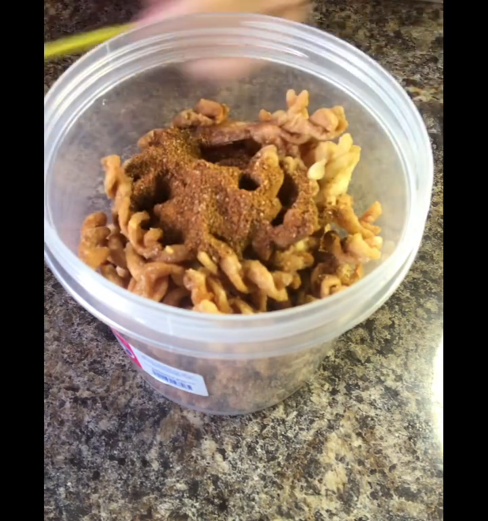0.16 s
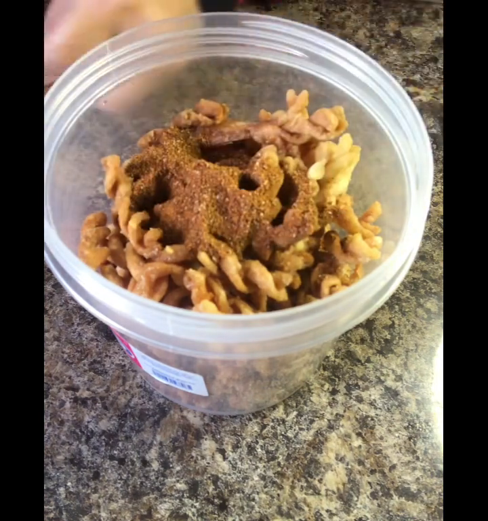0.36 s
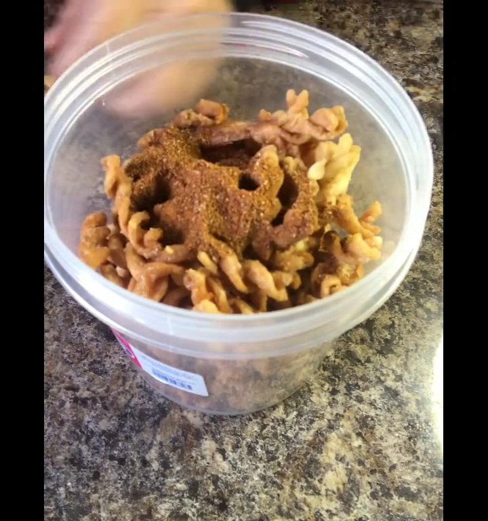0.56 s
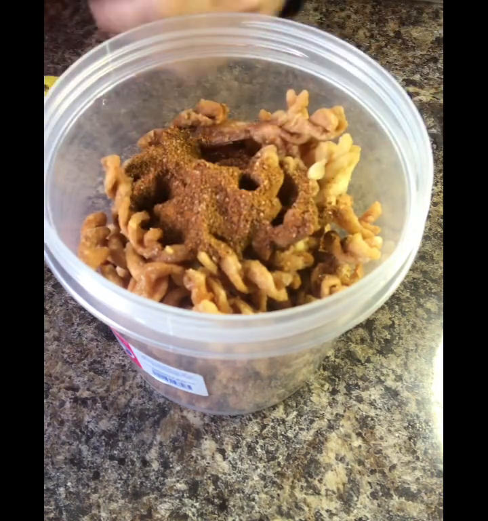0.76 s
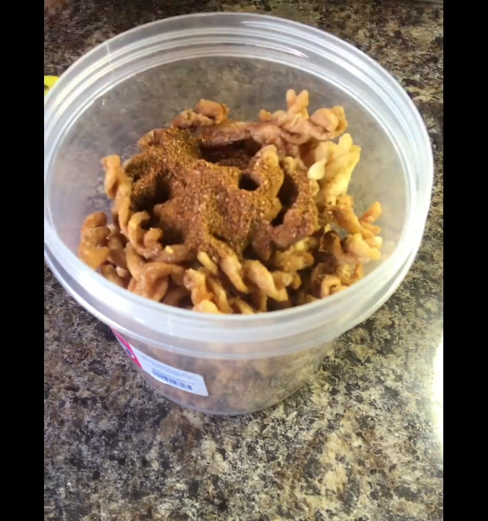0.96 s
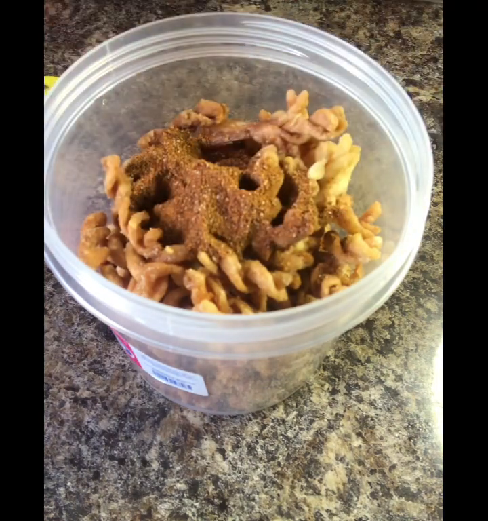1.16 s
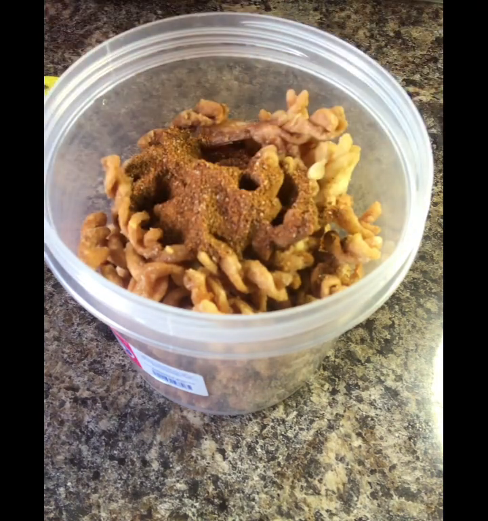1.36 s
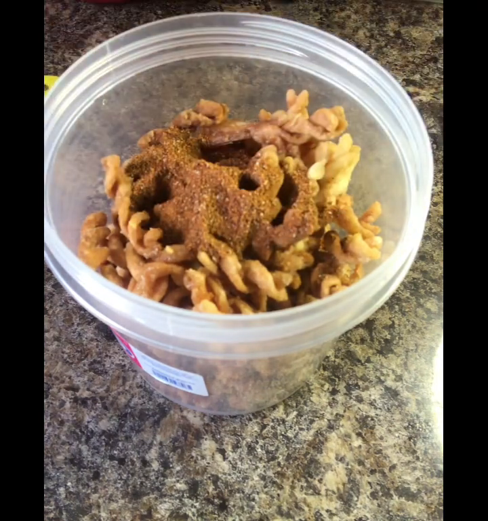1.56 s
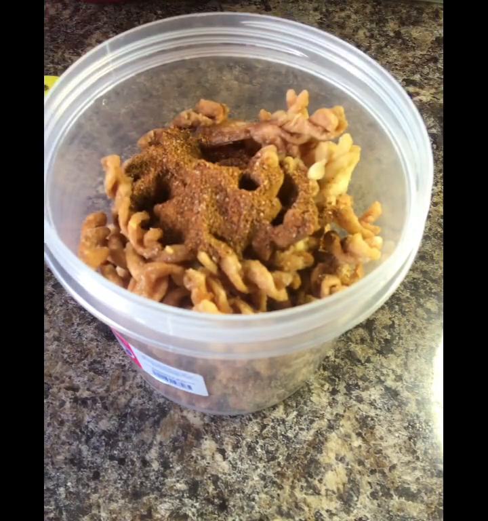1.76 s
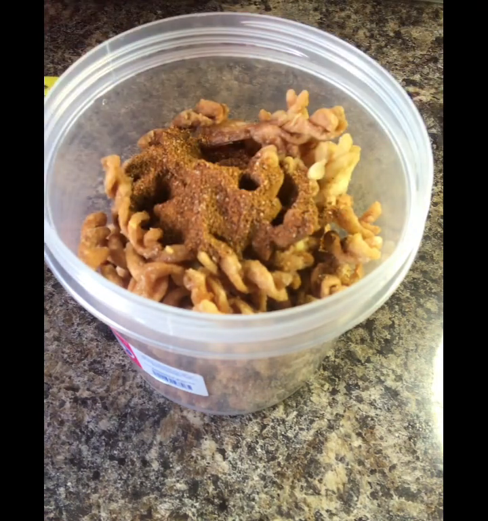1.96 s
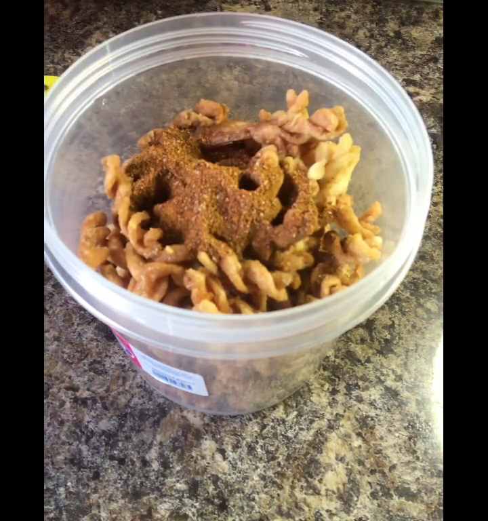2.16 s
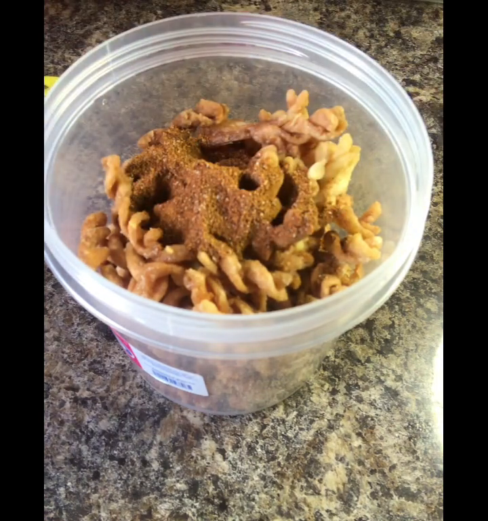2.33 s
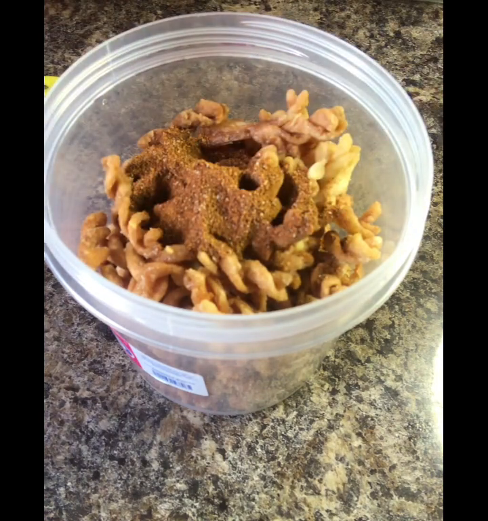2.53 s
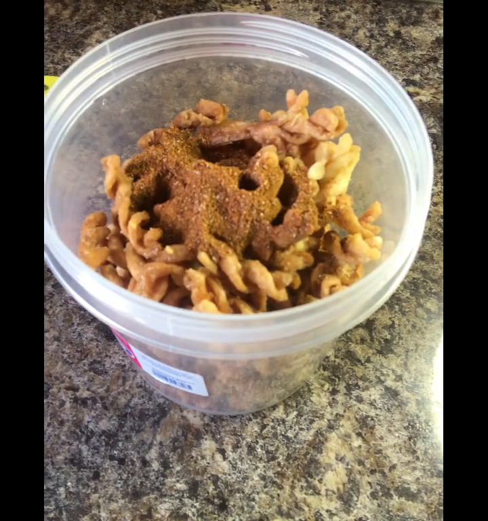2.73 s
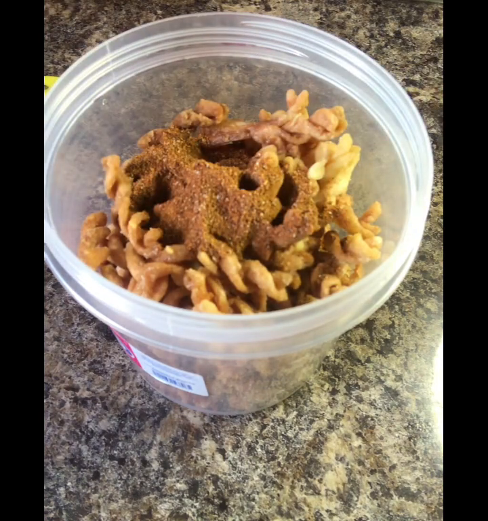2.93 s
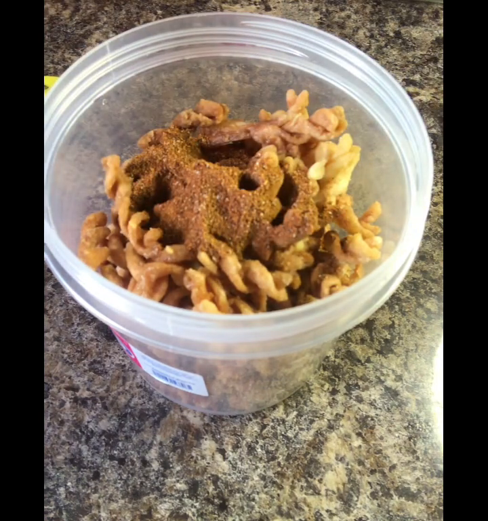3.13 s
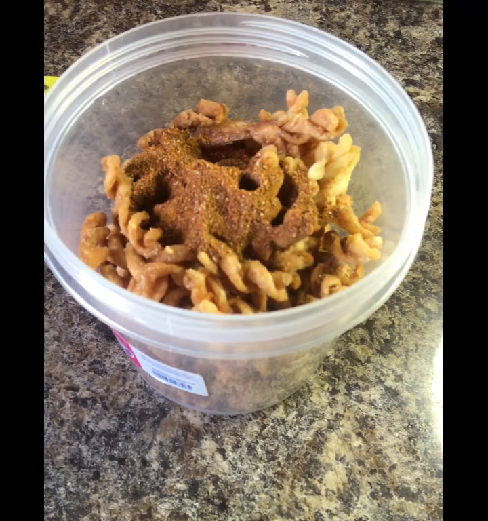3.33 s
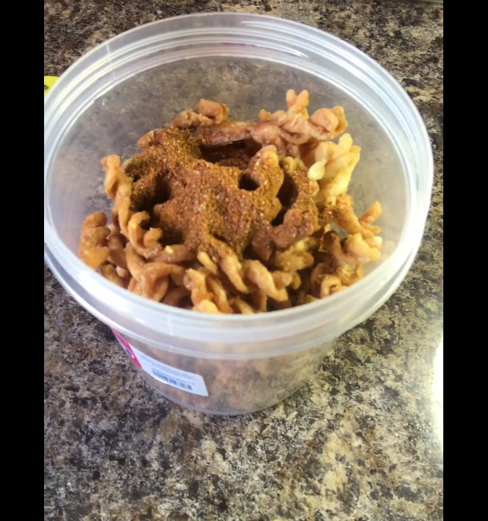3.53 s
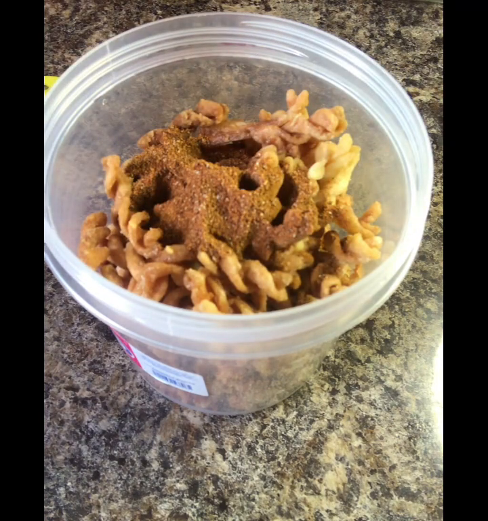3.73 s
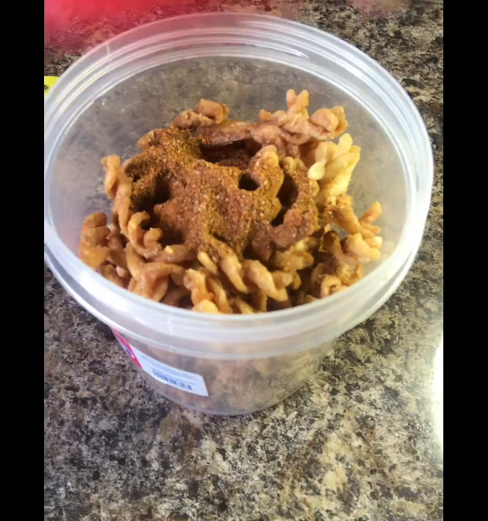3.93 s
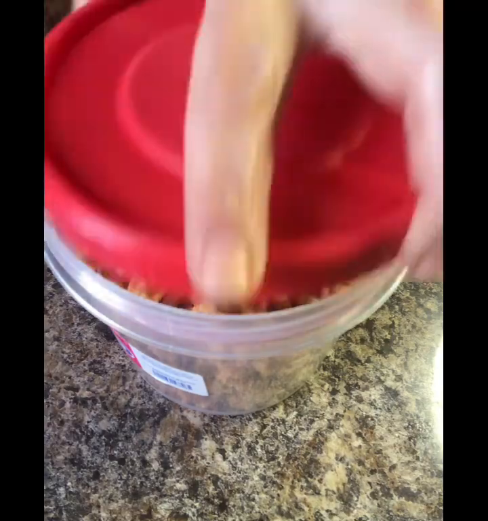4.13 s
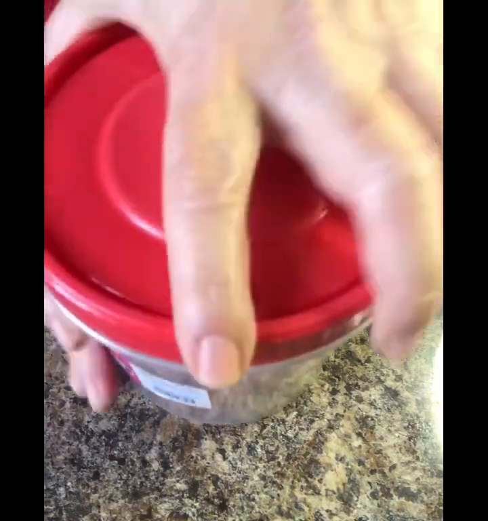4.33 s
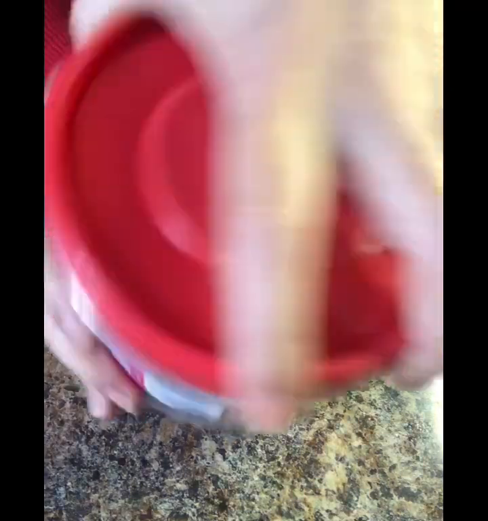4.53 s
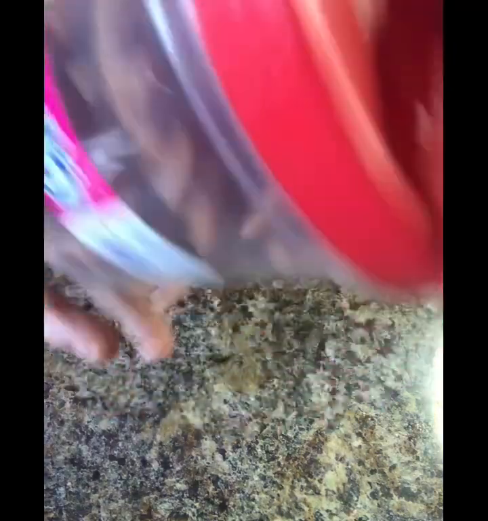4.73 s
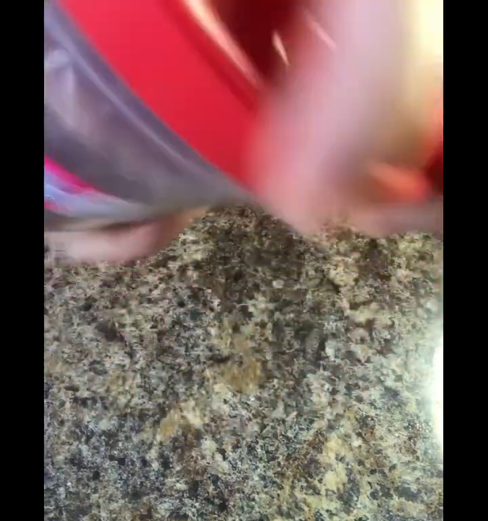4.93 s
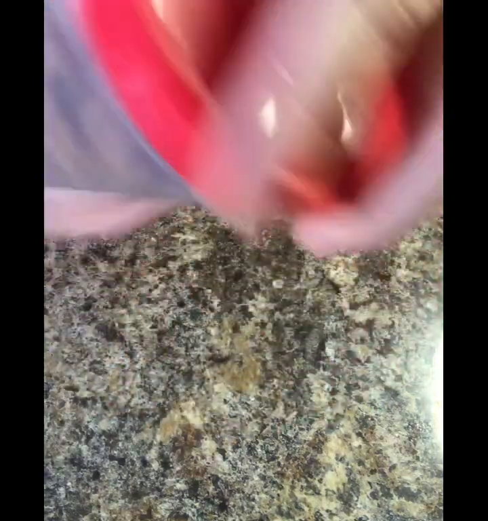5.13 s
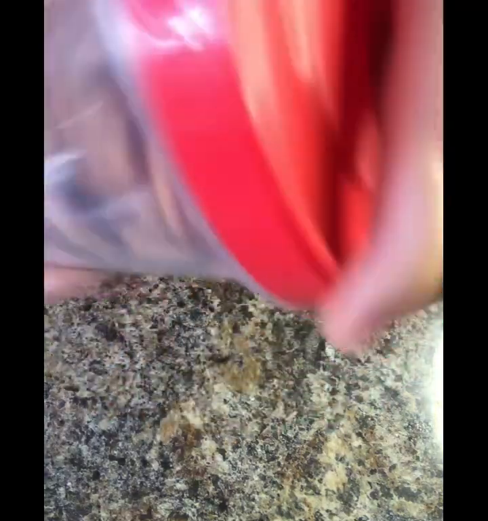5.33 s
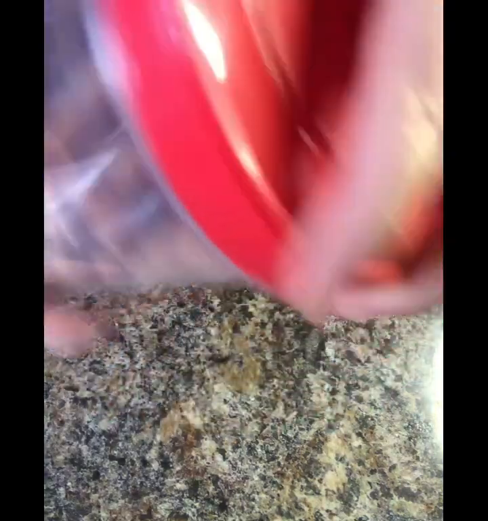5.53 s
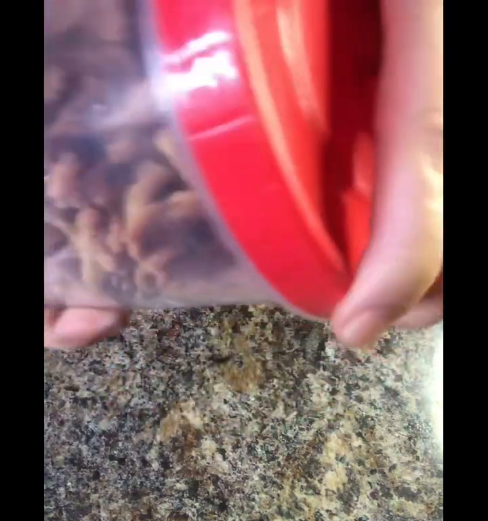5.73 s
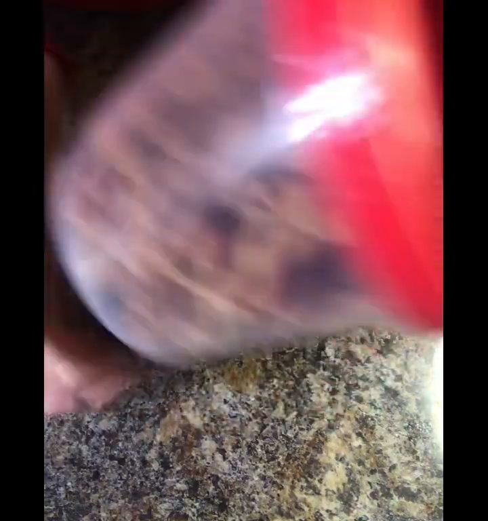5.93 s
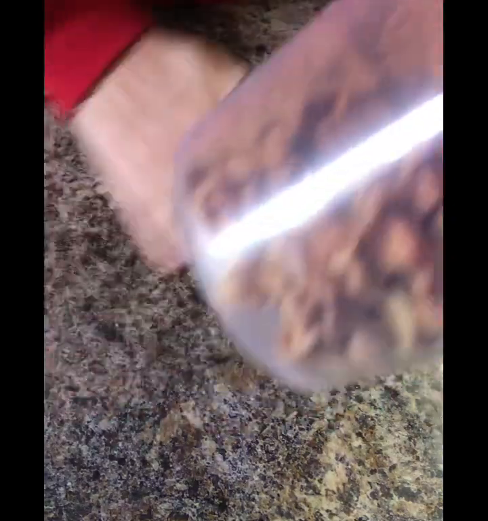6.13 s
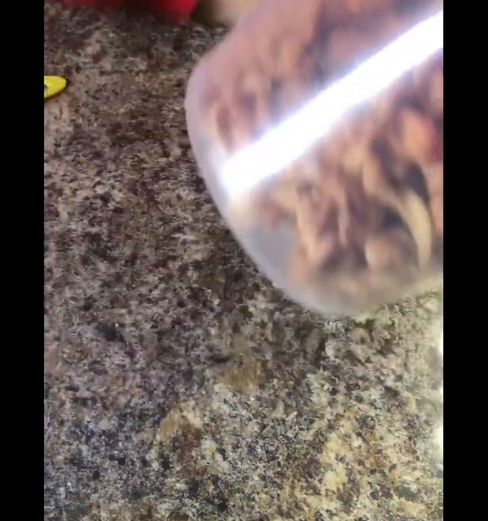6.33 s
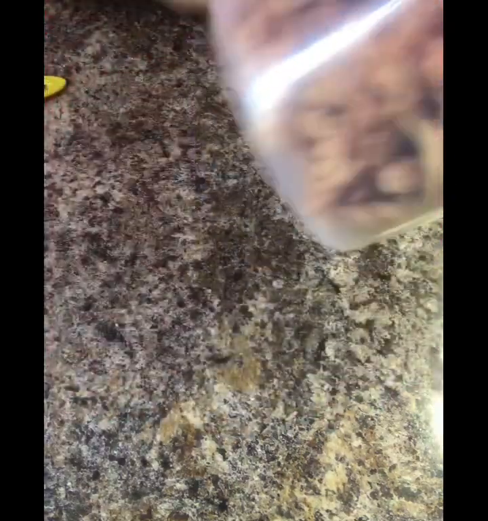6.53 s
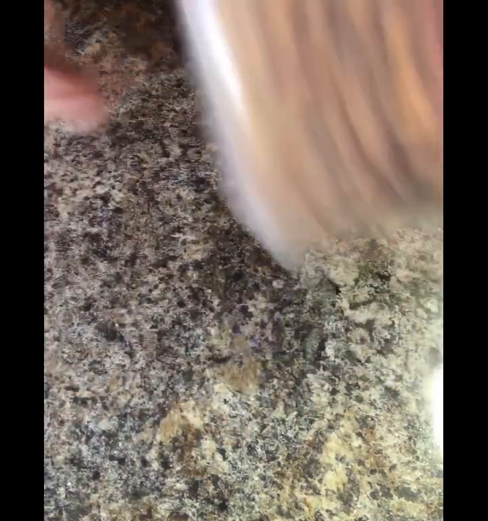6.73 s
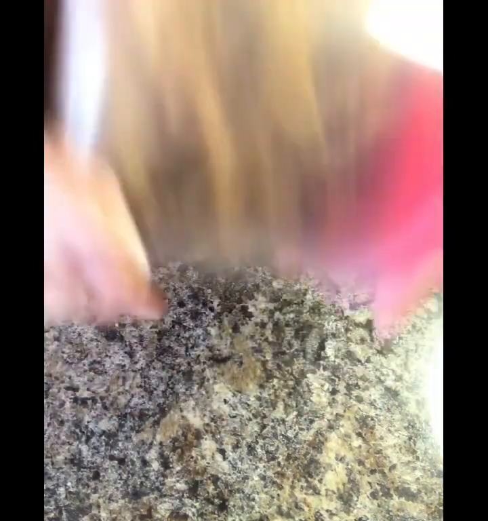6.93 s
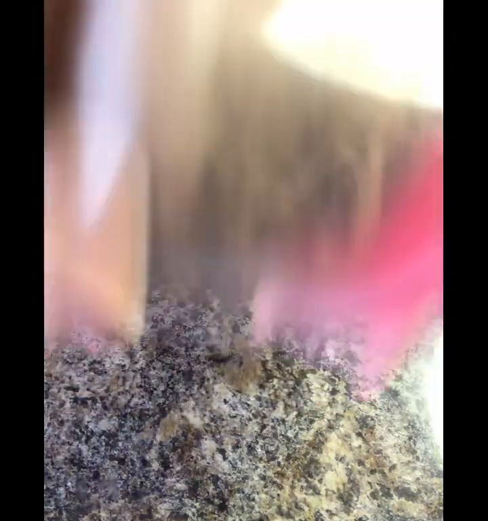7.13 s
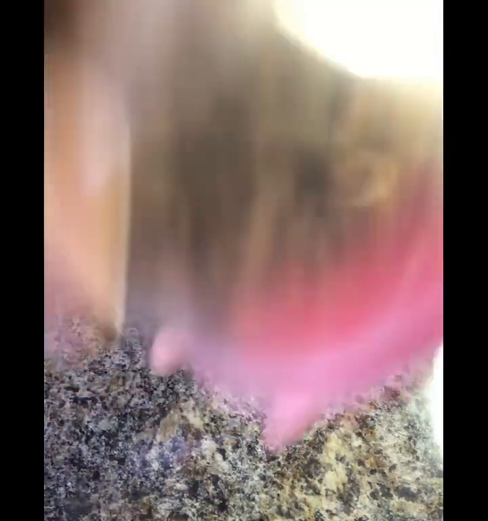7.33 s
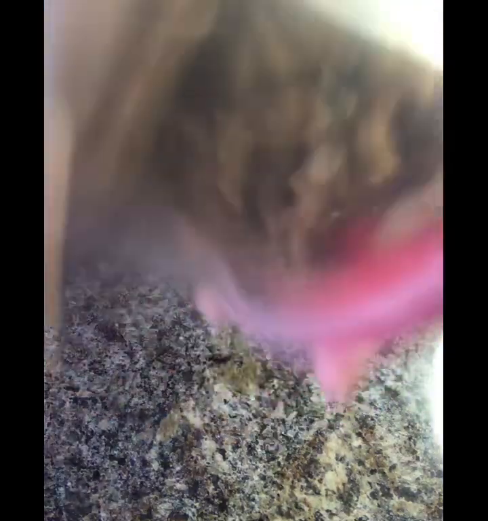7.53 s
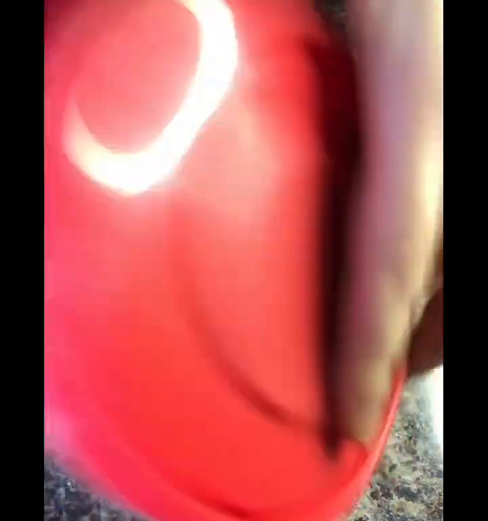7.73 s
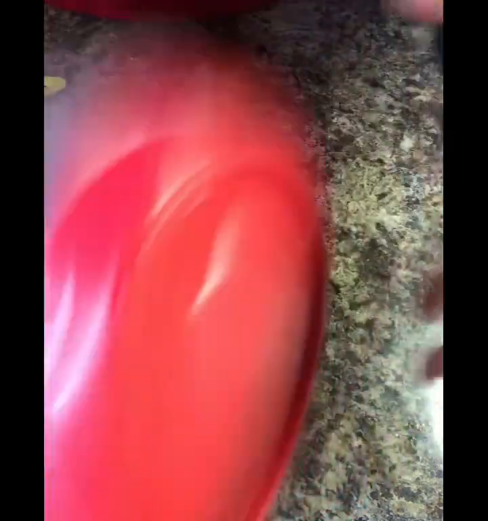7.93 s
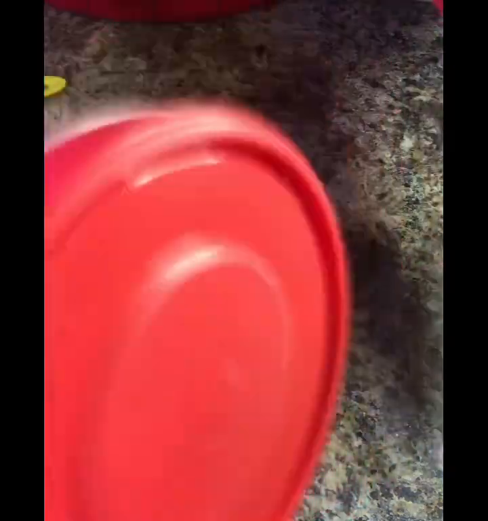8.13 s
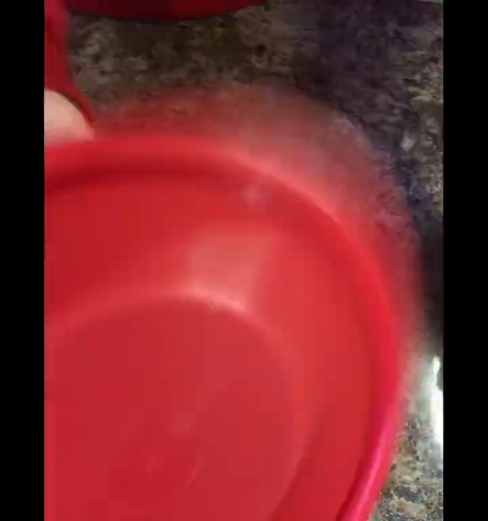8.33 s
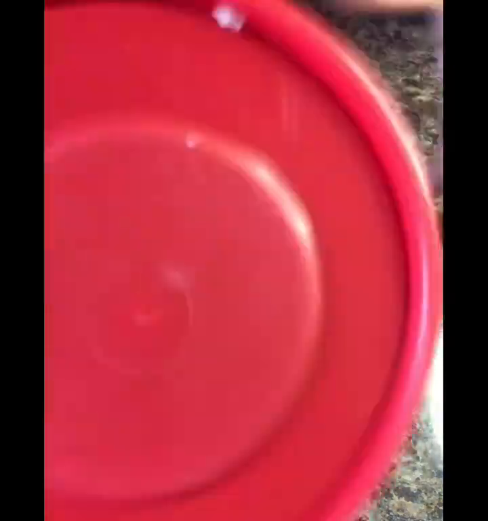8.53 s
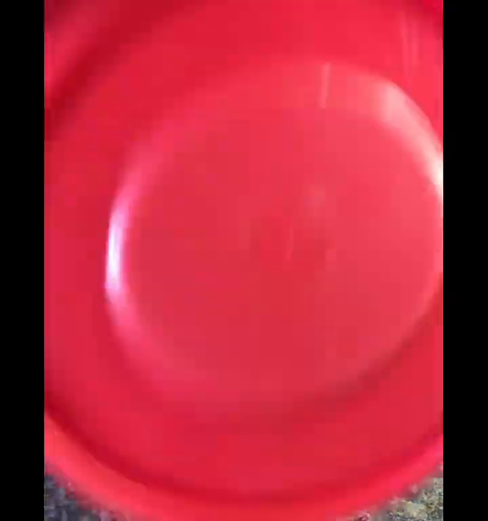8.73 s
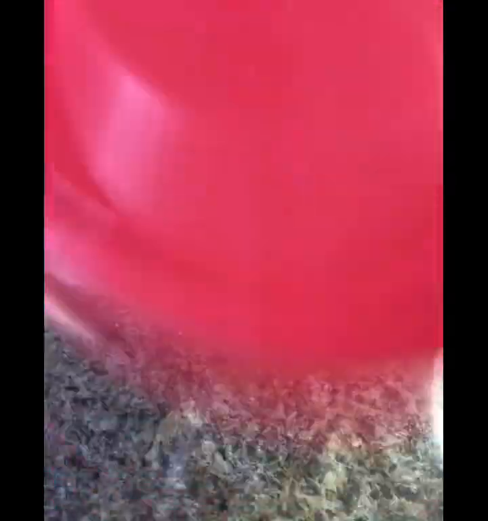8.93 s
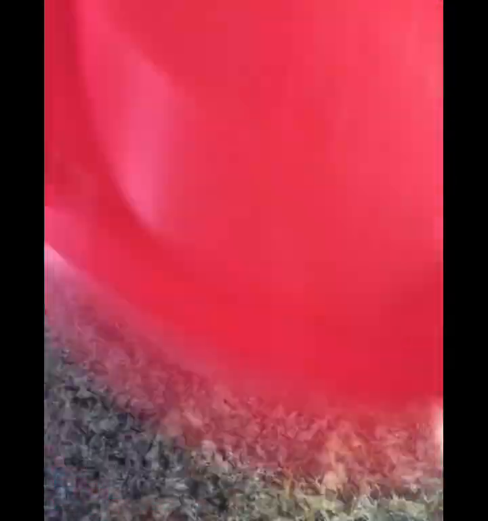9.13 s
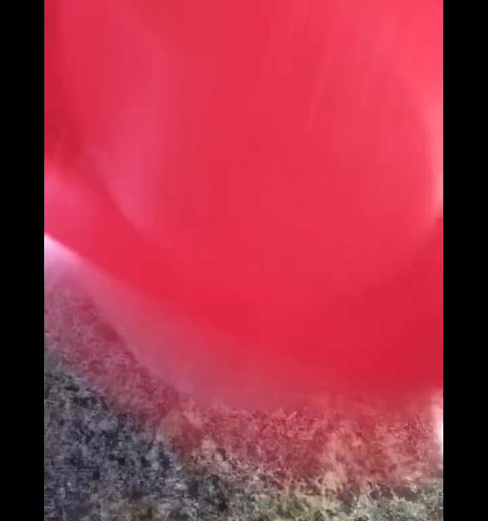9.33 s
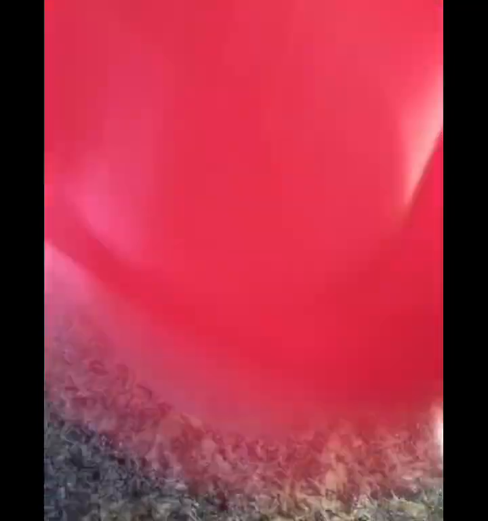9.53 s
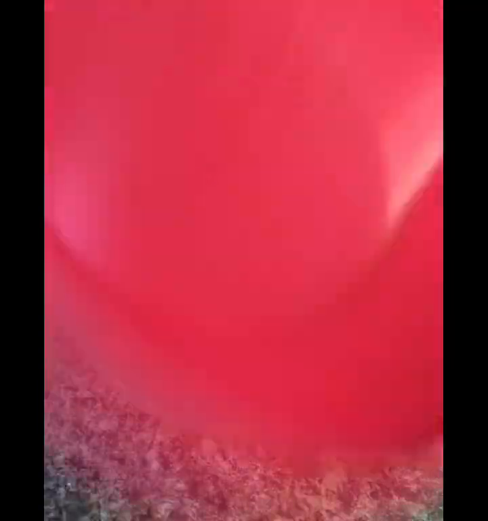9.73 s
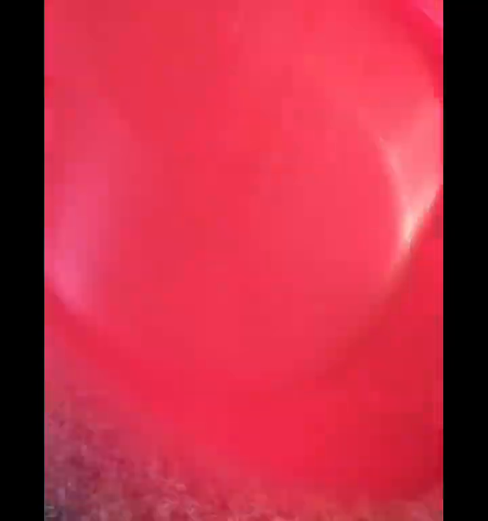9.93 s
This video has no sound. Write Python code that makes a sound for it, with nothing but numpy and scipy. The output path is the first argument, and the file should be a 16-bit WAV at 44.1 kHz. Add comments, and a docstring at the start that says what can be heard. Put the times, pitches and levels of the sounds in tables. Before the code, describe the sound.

In a quiet kitchen, a spoon knocks a few times against a plastic tub, and something slides faintly over a stone counter. A lid is set on with hollow knocks and twisted shut with a soft scraping. Then the tub is shaken close to the microphone, and crisp snack pieces tumble inside in loud, uneven bursts of crackling and hollow clatter.

```python
"""A quiet kitchen with a stone counter, and on it a plastic tub of crisp snack pieces. A spoon knocks
about, something slides over the stone, a lid is set on and screwed shut, then the tub is tipped and shaken.
Each impact excites damped modes of wall and lid, which ring like a small drum; the tumbling pieces land
in heaps and add the broadband crackle of brittle contact. Friction on stone and in the threads is a dense
train of tiny impulses. A short reverberant tail and a faint hush lie behind it all."""
import sys
import numpy as np
from scipy import signal
from scipy.fft import rfft, irfft, next_fast_len
from scipy.io import wavfile

SR = 44100
rng = np.random.default_rng(int(sys.argv[2]) if len(sys.argv) > 2 else 0)


def store_pcm(level_fs):
    """Save levels as 16-bit WAV."""
    pcm = np.round(np.clip(level_fs, -1, 1) * 32767).astype(np.int16)
    wavfile.write(sys.argv[1], SR, np.atleast_2d(pcm).T)


N = 439677

# Levels are relative: each source adds its own gain.
# heaps of pieces meeting wall or lid: t/s, half length/ms, wall level/dB, crackle level/dB
HEAPS = [(6.695, 34, -37, -41.5), (6.769, 11, -33.5, -41.5), (6.873, 27, -35.5, -42.5),
         (6.943, 21, -25.5, -30), (6.995, 19.6, -21, -26), (7.041, 8, -22, -48), (7.107, 30, -24, -30.5),
         (7.125, 11, -40, -30.5), (7.194, 22.8, -19.5, -23.5), (7.312, 10, -13.5, -23),
         (7.395, 17.7, -18.5, -22.5), (7.553, 17.7, -16, -24.5), (7.631, 12.6, -17.5, -23),
         (7.804, 34, -41, -49.5), (7.86, 16, -28.5, -38), (7.93, 30.4, -24, -30), (8.055, 27, -22.5, -30.5),
         (8.138, 15.3, -21, -23.5), (8.275, 28, -21, -29.5), (8.366, 18, -23.5, -25.5),
         (8.516, 20, -23.5, -31), (8.585, 19.5, -27, -27), (8.703, 16, -40.5, -44.5),
         (8.785, 72, -45.5, -49), (8.842, 10, -42.5, -51), (9.012, 12.8, -13, -28.5),
         (9.083, 11.3, -27, -26), (9.219, 9.6, -10.5, -25), (9.28, 10.8, -21, -23.5),
         (9.39, 3.4, -29, -33.5), (9.415, 11, -11.5, -23), (9.488, 11.3, -22.5, -24),
         (9.603, 5.5, -26, -36), (9.622, 6.3, -7, -20), (9.699, 15.3, -25, -28.5), (9.826, 9.1, -9, -19.5),
         (9.903, 9.7, -20.5, -22.5)]
# stray pieces rattling on, relative to their heap: t/s, wall level/dB, crackle level/dB
STRAY_LEVELS = [(6.5, -1.5, 1.5), (7.1, -17, -12), (7.7, -23, -11.5), (8.3, -11.5, -12), (8.9, -15, -10),
                (10, -45, -20)]
# hard hits of large pieces: t/s, wall level/dB, favoured wall f/Hz, drum level/dB, crack level/dB
LANDINGS = [(6.707, -27, 1210, -47, -18.5), (6.765, -27, 1230, -22, -34), (6.79, -26, 590, -34, -41),
            (6.927, -23, 905, -29, -16), (6.981, -13, 835, -26, -9.5), (7.009, -13.5, 1870, -21, -14.5),
            (7.038, -11.5, 500, -17, -21), (7.084, -24, 520, -21, -37), (7.129, -20, 1030, -47, -33),
            (7.177, -18, 1100, -16, -14), (7.188, -10, 850, -35, -10.5), (7.303, -12.5, 675, -33, -17),
            (7.398, -7, 1390, -17.5, -13.5), (7.515, -24, 1200, -36, -27), (7.539, -30, 1500, -25, -12.5),
            (7.551, -9.5, 590, -22, -16), (7.567, -15.5, 1180, -30, -32), (7.632, -16, 990, -19, -24),
            (7.843, -24, 1440, -24.5, -34), (7.941, -17.5, 900, -16.5, -39), (7.998, -11, 806, -20, -38),
            (8.028, -14.5, 1010, -24, -27), (8.051, -16.5, 500, -37, -23), (8.122, -17, 1210, -43, -13.5),
            (8.147, -18.5, 870, -27, -19), (8.257, -8, 1020, -31, -38), (8.288, -16, 670, -37, -23),
            (8.349, -17, 720, -46, -11), (8.378, -9, 850, -22, -38), (8.505, -18.5, 850, -17.5, -35),
            (8.522, -23, 660, -14.5, -35), (8.611, -14, 950, -23, -35), (8.623, -16.5, 880, -18.5, -44),
            (8.7, -42, 1000, -28, -48), (8.785, -31, 607, -23.5, -49), (8.987, -29, 1300, -40, -38),
            (9.002, -6, 710, -22, -22), (9.018, -12, 686, -20, -34), (9.061, -14.5, 755, -31, -40),
            (9.076, -16, 1370, -24, -20), (9.127, -14.5, 840, -19, -33), (9.196, -15, 870, -18, -32),
            (9.212, -4.5, 970, -13.5, -22), (9.278, -10, 710, -17, -30), (9.4, -13.5, 1700, -12.5, -13.5),
            (9.422, -9.5, 674, -30, -19), (9.484, -10, 665, -21, -36), (9.616, -6.5, 760, -20, -10),
            (9.625, -8.5, 630, -34, -13), (9.694, -10.5, 710, -24, -15), (9.82, 0, 690, -34, -10),
            (9.835, -9.5, 1640, -48, -21), (9.898, -13.5, 640, -19.5, -24)]
# lone brittle ticks: t/s, onset level/dB, f/Hz
TICKS = [(0.2057, -36, 2410), (3.9155, -57, 6100), (4.322, -28, 3280), (4.744, -34.5, 4220),
         (5.0197, -30, 5980), (5.485, -40, 3980), (5.9444, -57, 2900), (6.6377, -40, 2240),
         (6.8132, -27, 2510), (6.8576, -28, 2070), (7.1534, -15, 1990), (7.207, -9.5, 2440),
         (7.3485, -17, 2650), (8.4326, -34, 2380), (9.0417, -27, 2160), (9.2426, -15, 2320),
         (9.4693, -21, 4060), (9.7074, -22, 4200), (9.8692, -19.5, 3800), (9.9298, -18.5, 3900)]
# spoon on tub and counter: t/s, wall level/dB, favoured wall f/Hz, drum, crack and tick level/dB
SPOON_KNOCKS = [(0.006, -34, 1200, -45, -55, -69.5), (0.016, -6.5, 1090, -16.5, -19, -45),
                (0.037, -11.5, 580, -19, -33, -55), (0.219, -19.5, 650, -57, -41, -64),
                (0.24, -20.5, 620, -27.5, -41, -70), (0.279, -32, 1520, -31, -19, -74),
                (0.339, -37.5, 1060, -34, -55, -73), (0.49, -36.5, 1760, -48, -32.5, -29),
                (0.52, -39, 791, -65, -40, -37.5), (0.628, -28.5, 1100, -42, -30.5, -45),
                (0.664, -24.5, 1590, -38.5, -25.5, -43)]
# the lid being set on and turned: columns as for the spoon
LID_KNOCKS = [(4.097, -26, 855, -27.5, -45.5, -72), (4.211, -56, 684, -40, -39, -54),
              (4.269, -45, 867, -31, -29.5, -46), (4.31, -31, 840, -32, -36, -60),
              (4.33, -29, 850, -29, -38, -50), (4.381, -33.5, 1900, -26, -33, -43),
              (4.388, -22, 810, -14.5, -26, -44), (4.704, -29, 980, -42, -31.5, -53),
              (4.795, -42, 640, -44, -58, -65), (4.941, -30, 2030, -44, -31, -43),
              (4.985, -34, 759, -33, -48, -41), (5.074, -31, 1030, -37, -33, -62),
              (5.3, -17.5, 800, -14, -25.5, -67), (5.342, -20, 526, -14.5, -30, -47),
              (5.384, -32, 1870, -43, -33, -35), (5.459, -35.5, 1570, -60, -32, -65),
              (5.586, -31.5, 1920, -25.5, -51, -56), (5.606, -26, 1200, -42, -35, -65),
              (5.662, -39, 1210, -38, -37, -62), (5.711, -40, 1940, -32.5, -45, -47)]
# heavy pushes that boom through the tub: t/s, level/dB
THUDS = [(0.016, -38.5), (0.662, -47), (4.331, -31.5), (4.388, -30.5), (7.397, -44), (7.631, -27.5),
         (8.787, -37.5), (9.198, -38)]
# turns of the lid and fingers on plastic: t/s, half length/ms, grit, hiss and wall level/dB
SWISHES = [(4.2, 80, -63, -79, -68), (4.31, 44, -70, -62, -47.5), (4.4, 12, -68, -70, -64),
           (4.49, 45, -76, -78, -76), (4.61, 55, -51.5, -68, -64), (4.76, 91, -60, -62, -52.5),
           (4.99, 94.5, -41.5, -48, -42.5), (5.17, 43, -45.5, -50.5, -52), (5.27, 45, -78, -57, -41),
           (5.39, 55, -37, -48, -41.5), (5.56, 50, -43, -56, -49.5), (5.7, 55, -50.5, -59, -49.5),
           (5.79, 53, -65, -76, -67), (5.875, 31, -45.5, -60.5, -57.5), (5.96, 40, -75, -82, -74),
           (6.22, 134, -57, -60, -72.5)]
# the slide over stone: t/s, level/dB
SLIDE_LEVELS = [(1.68, -85), (1.728, -86), (1.74, -62), (1.946, -61), (1.986, -53.5), (2.086, -53),
                (2.23, -58), (2.314, -53.5), (2.418, -59), (2.614, -58.5), (2.702, -62.5), (2.938, -54),
                (2.964, -58), (3.0, -60), (3.044, -50), (3.166, -76), (3.25, -84.5)]
# two light brushes before the slide: t/s, half length/ms, level/dB
BRUSHES = [(1.07, 18, -65), (1.23, 30, -59.5)]
# low, middle and high modes of tub and lid: f/Hz, level/dB, nominal T60/s
THUMP_MODES = [(116, -5.5, 0.15), (72, -9.5, 0.22), (172, -2, .1)]
DRUM_MODES = [(331.4, 1.5, 0.12), (262, -11.5, 0.09), (377, -6.5, 0.15), (430, -4, .06)]
WALL_MODES = [(518, -3.5, 0.061), (591, -5.5, 0.088), (665, -1, 0.065), (758, -3, 0.057),
              (849, -2.5, 0.076), (956, 0, 0.032), (1045, -6, .07), (1183, -1, 0.027), (1386, -10, 0.061),
              (1640, -12, 0.044), (1872, -10, 0.063), (2380, -9.5, 0.077)]
# resonances of the sliding object: f/Hz, bandwidth/Hz, level/dB
SLIDE_MODES = [(910, 190, 9.5), (1628, 55, 0.5), (2275, 230, 10), (3300, 270, 2), (4340, 110, -3.5),
               (5670, 230, -2)]
# spectral densities of brittle contact, friction on stone, the threads and the hush: f/Hz, level/dB
CRISP_SPECTRUM = [(880, -33), (1500, -3), (2150, -7.5), (2430, -9), (2820, -8.5), (4300, -12),
                  (6960, -19.5), (10400, -30), (15100, -26), (16000, -44.5), (16500, -56)]
STONE_SPECTRUM = [(290, -38), (500, -18.5), (1220, -9.5), (1610, -5.5), (1760, -3.5), (2290, -7),
                  (4970, -7), (15100, -9), (15800, -8), (16500, -30)]
PLASTIC_SPECTRUM = [(1060, -24), (1800, -9), (2380, -3.5), (2810, -2.5), (6180, -8), (10400, -17),
                    (14400, -9.5), (16000, -21), (16500, -40)]
HUSH_SPECTRUM = [(12, -51.5), (20, -18), (49, -1.5), (86, -3.5), (108, -1.5), (281, -10), (305, -6.5),
                 (372, -9), (772, -14), (2120, -22.5), (9150, -33), (13900, -34), (16500, -40)]

HEAP_SQUARENESS, SWISH_SQUARENESS = 1.85, 4.6   # 2 is a Gaussian swell; more is flatter on top
CRACK_RISE_S, TICK_T60_S, STRAY_T60_S = 0.00059, 0.0088, 0.28
KITCHEN_T60_S, KITCHEN_TREBLE_HZ = 0.38, 5000


def tumbling():
    """Random impact excitation: many small contacts drive the tub's modes and crackle, heap by heap."""
    wall, crisp = swells(HEAPS, HEAP_SQUARENESS)
    stray_wall, stray_crisp = envelopes(STRAY_LEVELS) * lingering(np.array([wall, crisp]))
    contacts = grains(450, spread_db=3)
    wall_drive = np.hypot(from_db(-3) * wall, stray_wall)   # independent contacts add in power
    drum_drive = np.hypot(from_db(-10) * wall, from_db(-0.5) * stray_wall)
    body = driven_modes(contacts, wall_drive, WALL_MODES, damping=2.7)
    body += driven_modes(contacts, drum_drive, DRUM_MODES, damping=6.6)
    body = butterworth(body, 2, [240, 3000], "band")   # light, blunt pushes
    clicks = contacts + 0.055 * grains(1700, spread_db=8)
    crackle = colour(bursts(clicks, t60=0.015), CRISP_SPECTRUM)
    # crisp heaps with little weight on the wall bring out the ring of the lid rim
    rim = np.clip(crisp / (wall + 1e-9), 0, 1.3) ** 2 * resonance(crackle, 4020, 1000)
    return body + np.hypot(from_db(-1.44) * crisp, stray_crisp) * crackle + 2.06 * crisp * rim


def impacts(rows, wall_stretch, drum_stretch, thump_db, wall_gain_db, crack_gain_db, crack_t60):
    """Impulse response: each blow sets the tub ringing and emits a short crack with a brighter tick."""
    body, crack, tick = np.zeros((3, N + SR))
    t = np.arange(SR // 3) / SR
    rise = 1 - np.exp(-t / CRACK_RISE_S)
    for s, wall_db, wall_hz, drum_db, crack_db, tick_db in rows:
        scatter = rng.standard_normal(24)
        span = slice(round(s * SR), round(s * SR) + len(t))
        body[span] += from_db(wall_db + wall_gain_db) * ringing(WALL_MODES, wall_stretch, scatter, wall_hz)
        body[span] += from_db(drum_db + 2) * ringing(DRUM_MODES, drum_stretch, scatter)
        body[span] += from_db(drum_db + thump_db) * ringing(THUMP_MODES, 0.97, scatter)
        crack[span] += from_db(crack_db + crack_gain_db - 60 * t / crack_t60) * rise
        tick[span] += from_db(tick_db + crack_gain_db - 60 * t / (0.7 * crack_t60))
    low, high = crossover(colour(rng.standard_normal(N), CRISP_SPECTRUM))
    return body[:N] + crack[:N] * low + tick[:N] * high


def landings():
    """Added damping: large pieces strike a tub held in the hands, so it rings only briefly."""
    rows = [(*row, row[-1] - 26) for row in LANDINGS]   # tick level: 26 dB under the crack
    return impacts(rows, wall_stretch=0.51, drum_stretch=0.72, thump_db=-20.5,
                   wall_gain_db=5.56, crack_gain_db=1.7, crack_t60=0.015)


def ticks():
    """Brittle transients: each is a fast-decaying puff of noise in a broad band around its pitch."""
    out, t = np.zeros(N + SR), np.arange(SR // 40) / SR
    for s, db, hz in TICKS:
        puff = unit_rms(resonance(rng.standard_normal(len(t)), hz, 0.15 * hz))
        out[round(s * SR):][:len(t)] += from_db(db - 60 * t / TICK_T60_S) * puff
    return out[:N]


def spoon():
    """Free vibration: the wall of the open tub rings on after each knock of the spoon."""
    return impacts(SPOON_KNOCKS, wall_stretch=1.03, drum_stretch=0.8, thump_db=-14.5,
                   wall_gain_db=3, crack_gain_db=-0.3, crack_t60=0.027)


def lid():
    """Damped vibration: under the knocking lid the wall modes die sooner and the drum modes later."""
    return impacts(LID_KNOCKS, wall_stretch=0.77, drum_stretch=1.01, thump_db=-23,
                   wall_gain_db=4.9, crack_gain_db=-0.15, crack_t60=0.029)


def thuds():
    """Low-mode excitation: heavy pushes make the whole tub boom."""
    out = np.zeros(N + SR)
    for s, db in THUDS:
        boom = ringing(THUMP_MODES, stretch=1.8, scatter=rng.standard_normal(24))
        out[round(s * SR):][:len(boom)] += from_db(db + 7.5) * boom
    return out[:N]


def threads():
    """Sliding friction: plastic on plastic gives grit and hiss and drives the modes of the closed tub."""
    grit, hiss, wall = swells(SWISHES, SWISH_SQUARENESS)
    rub = grains(2500, spread_db=1.5)
    low, high = crossover(colour(rub, PLASTIC_SPECTRUM))
    body = driven_modes(rub, wall, WALL_MODES, damping=12.7)
    body += driven_modes(rub, from_db(-2) * wall, DRUM_MODES, damping=2.7)
    return from_db(-7) * grit * low + from_db(0.5) * hiss * high + from_db(-8) * body


def slide():
    """Friction noise filtered by resonances of the sliding object, which come and go with the grip."""
    level = envelopes(SLIDE_LEVELS)[0] + swells(BRUSHES, HEAP_SQUARENESS)[0]
    rub = colour(grains(9000, spread_db=2), STONE_SPECTRUM)
    pressure = (level / level.max()) ** 0.54   # firmer pressure brings out the resonances
    rings = sum(from_db(db + 3.9 * drift(2.3)) * resonance(rub, hz, width) for hz, width, db in SLIDE_MODES)
    return from_db(-3) * level * (rub + 1.36 * pressure * rings)


def rumble():
    """Structure-borne sound: the shaking travels through arms and counter as dull low noise."""
    low = butterworth(rng.standard_normal(N), 3, [48, 140], "band")
    wall = swells(HEAPS, HEAP_SQUARENESS)[0]
    return from_db(-35.5) * np.sqrt(lingering(wall)) * unit_rms(low)


def kitchen(x):
    """Diffuse reverberation: convolution with decaying noise whose treble dies sooner."""
    t = np.arange(SR // 2) / SR
    noise = rng.standard_normal(len(t))
    dull = butterworth(noise, 1, KITCHEN_TREBLE_HZ, "low")
    tail = dull * from_db(-60 * t / KITCHEN_T60_S)
    tail += (noise - dull) * from_db(-60 * t / (0.22 * KITCHEN_T60_S))
    tail *= np.clip(t / 0.0013, 0, 1)
    return signal.fftconvolve(x, tail / np.sqrt(np.sum(tail ** 2)))[:N]


def hush():
    """Stationary noise: the faint, bass-heavy background of the room."""
    return from_db(-64) * colour(rng.standard_normal(N), HUSH_SPECTRUM)


def ringing(modes, stretch, scatter, favoured_hz=None):
    """Modal superposition: decaying sines, strongest near the favoured pitch; stretch scales T60."""
    favoured_hz = favoured_hz or modes[0][0]
    hz, db, t60 = np.transpose(modes)[:, :, None]
    t = np.arange(SR // 3) / SR
    gain = from_db(db + 2.5 * scatter[:len(hz), None] - 20 * np.abs(np.log2(hz / favoured_hz)))
    detuned_hz = hz * (1 + 0.008 * scatter[-len(hz):, None])
    tones = gain * np.sin(2 * np.pi * detuned_hz * t) * from_db(-60 * t / (t60 * stretch))
    rise = 1 - np.exp(-t * favoured_hz / 0.87)   # the push lasts part of a cycle
    return tones.sum(0) / np.sqrt(np.sum(gain ** 2)) * rise


def driven_modes(contacts, strength, modes, damping):
    """Forced vibration: each hand-damped mode couples to each contact with a random weight."""
    out, power, at, force = 0, 0, np.flatnonzero(contacts), np.zeros(N)
    for hz, db, t60 in modes:
        force[at] = contacts[at] * from_db(4 * rng.standard_normal(len(at)))
        width_hz = damping / t60
        gain = from_db(db) / np.std(resonance(force[:N // 3], hz, width_hz))
        out += gain * resonance(force * strength + 1e-18, hz, width_hz)
        power += from_db(2 * db)
    return out / np.sqrt(power)


def resonance(x, hz, width_hz):
    """Two-pole resonator with unit peak gain."""
    r = np.exp(-np.pi * width_hz / SR)
    gain = (1 - r * r) / 2
    return signal.lfilter([gain, 0, -gain], [1, -2 * r * np.cos(2 * np.pi * hz / SR), r * r], x)


def grains(per_s, spread_db):
    """Poisson process: random clicks, a few much larger than the rest."""
    sizes = from_db(spread_db * np.minimum(rng.exponential(1, N), 4)) * rng.choice([-1, 1], N)
    return sizes * (rng.random(N) < per_s / SR)


def bursts(clicks, t60):
    """Exponential decay: each click becomes a short puff of noise."""
    keep = from_db(-60 / (t60 * SR))
    return rng.standard_normal(N) * signal.lfilter([1], [1, -keep], np.abs(clicks) + 1e-18)


def swells(rows, squareness):
    """Power summation of swells, 6 dB down a half length from their middle; one gain per level column."""
    power = np.zeros((len(rows[0]) - 2, N + SR))
    for s, half_ms, *levels_db in rows:
        middle, reach = round(s * SR), int(half_ms * SR / 250)   # reach: four half lengths
        bump_db = -6 * np.abs(np.linspace(-4, 4, 2 * reach)) ** squareness
        power[:, middle - reach:middle + reach] += from_db(np.add.outer(levels_db, bump_db)) ** 2
    return np.sqrt(power[:, :N])


def lingering(heap):
    """Leaky integration of power: the strength of a heap lingers and dies away."""
    keep = from_db(-120 / (STRAY_T60_S * SR))
    return np.sqrt(signal.lfilter([50 / SR], [1, -keep], heap ** 2 + 1e-18))


def envelopes(rows):
    """Level columns interpolated to gains, silent outside the table."""
    s, *columns = np.transpose(rows)
    return [from_db(np.interp(np.arange(N) / SR, s, db, left=-140, right=-140)) for db in columns]


def drift(hz):
    """Slow random fluctuation of rms 1, drawn 30 times a second."""
    steps = rng.standard_normal(int(N / SR * 30) + 2)
    smooth = signal.lfilter([1], [1, -np.exp(-2 * np.pi * hz / 30)], steps)
    return np.interp(np.arange(N) * 30 / SR, np.arange(len(steps)), unit_rms(smooth))


def colour(x, spectrum):
    """Spectral shaping, interpolated over log frequency; rms 1."""
    hz, db = np.transpose(spectrum)
    size = next_fast_len(len(x))
    log_hz = np.log(np.arange(size // 2 + 1) * SR / size + 1)
    gain = from_db(np.interp(log_hz, np.log(hz), db))
    return unit_rms(irfft(rfft(x, size) * gain, size)[:len(x)])


def crossover(x):
    """Bands below and above the dip in the treble, each of rms 1."""
    return [unit_rms(butterworth(x, 4, 8500, kind)) for kind in ("low", "high")]


def butterworth(x, order, hz, kind):
    """Maximally flat filter."""
    return signal.sosfilt(signal.butter(order, hz, kind, fs=SR, output="sos"), x)


def from_db(db):
    """Decibels to gain."""
    return 10 ** (np.asarray(db) / 20)


def unit_rms(x):
    """Normalisation to rms 1."""
    return x / np.sqrt(np.mean(x ** 2) + 1e-20)


def scene():
    """Direct and reverberant sound: the tub is shaken close by, so the room is fainter behind it."""
    handling = spoon() + lid() + thuds() + slide() + threads()
    shaking = landings() + tumbling() + ticks()
    room = from_db(-10.5) * kitchen(handling + from_db(-6) * shaking)
    airborne = butterworth(handling + shaking + room, 2, 60, "high")   # a small tub radiates no deep bass
    return (airborne + rumble() + hush())[None]


def record(dry):
    """Clipping and band limiting: peaks stop at full scale, and the treble ends at 16.7 kHz."""
    return signal.sosfilt(signal.ellip(12, .5, 95, 16700, fs=SR, output="sos"), np.clip(dry, -1, 1))


dry = scene()
out = record(dry)
store_pcm(out)
```